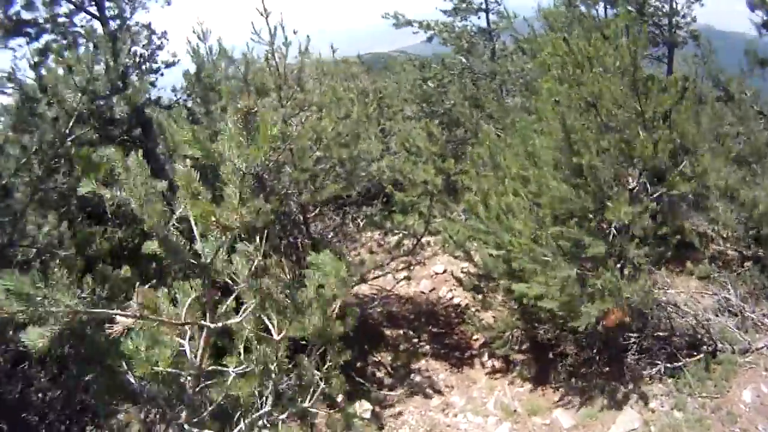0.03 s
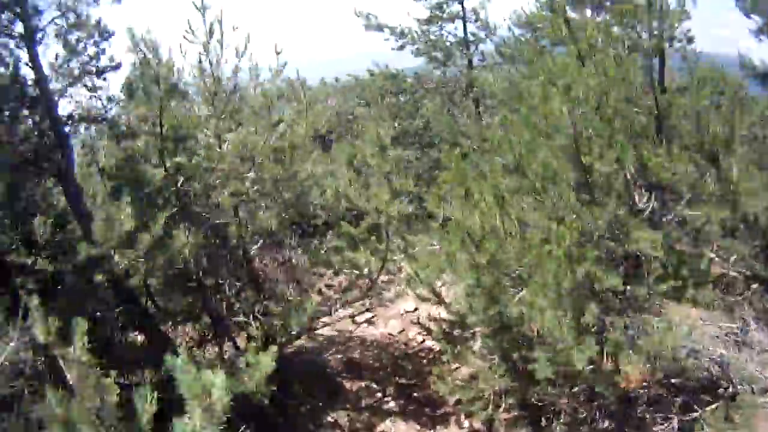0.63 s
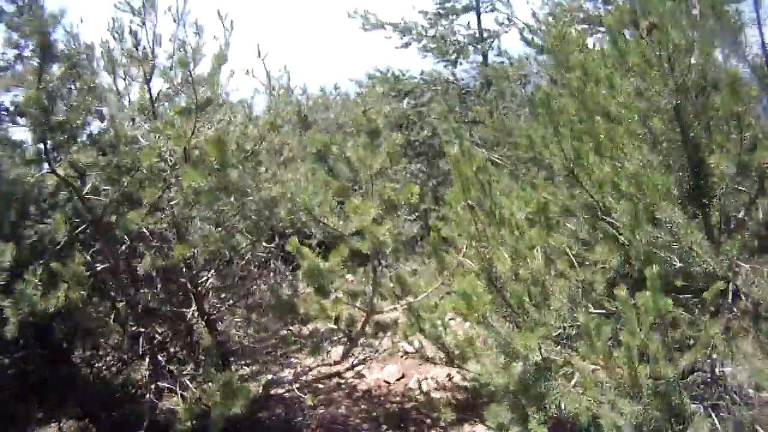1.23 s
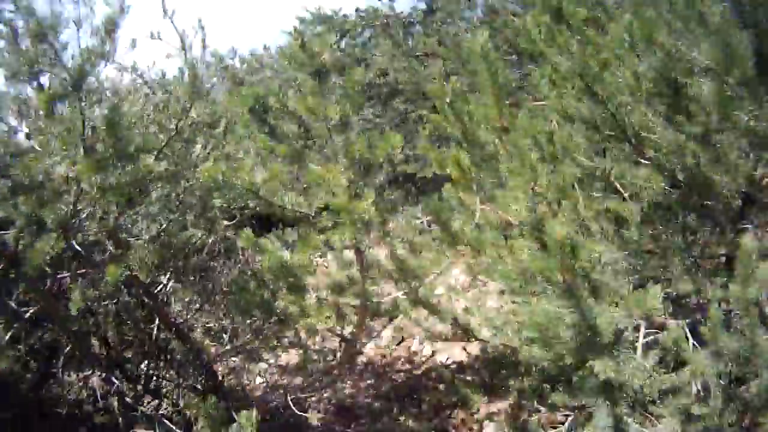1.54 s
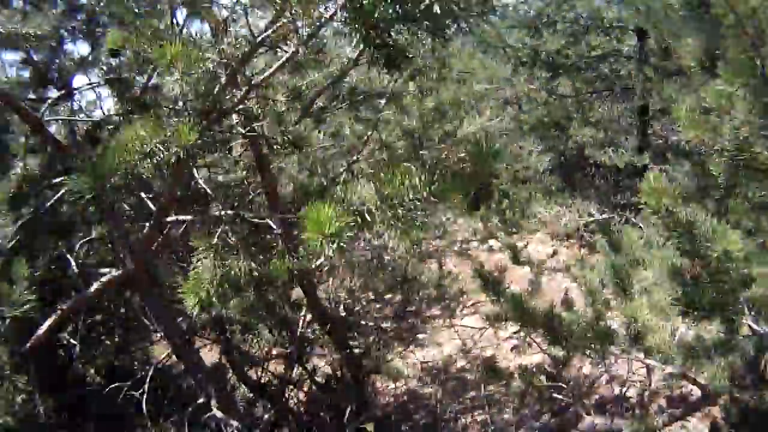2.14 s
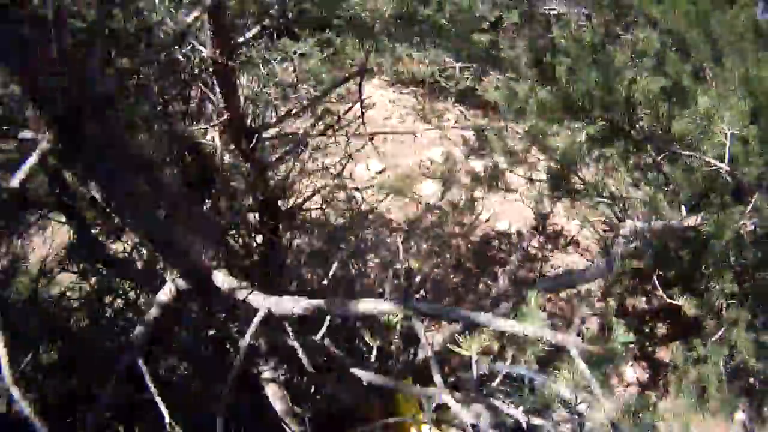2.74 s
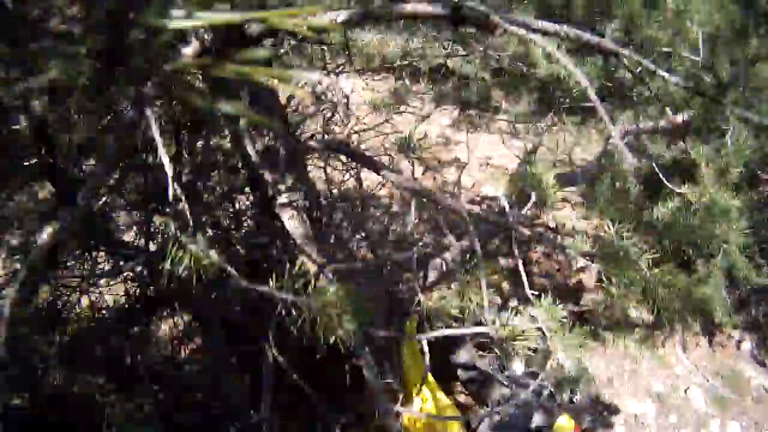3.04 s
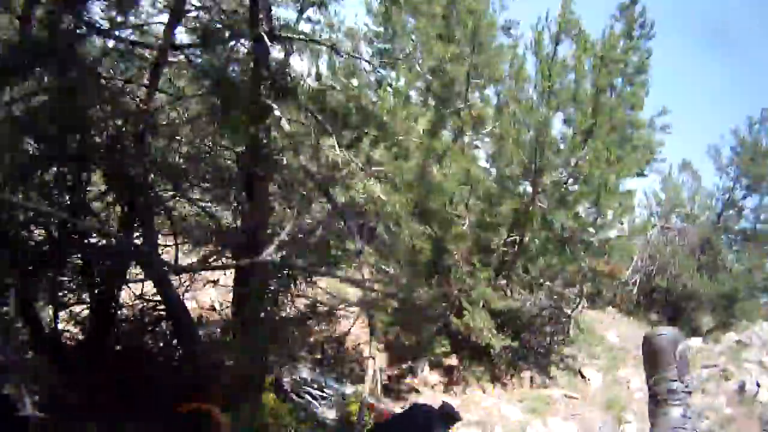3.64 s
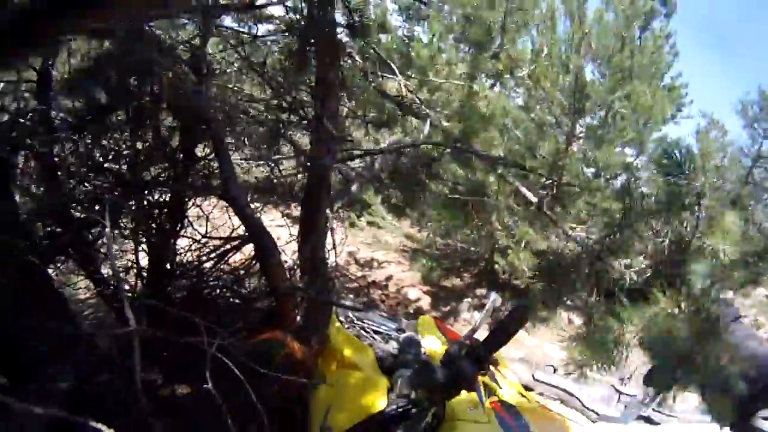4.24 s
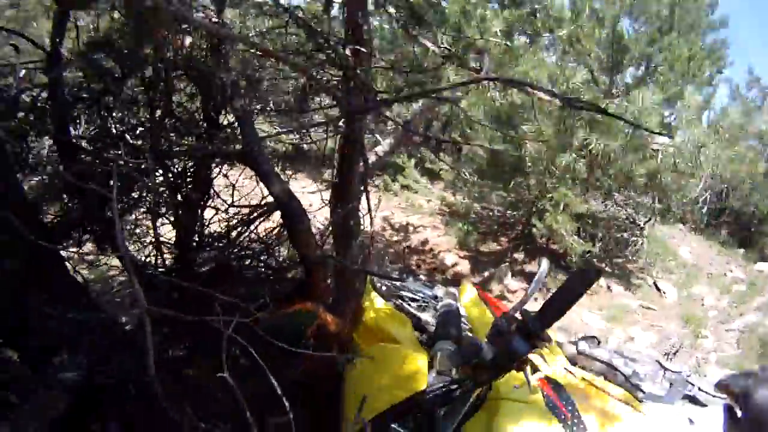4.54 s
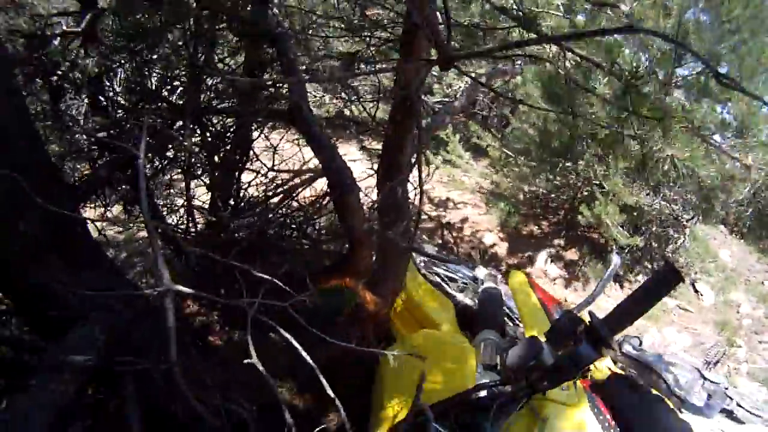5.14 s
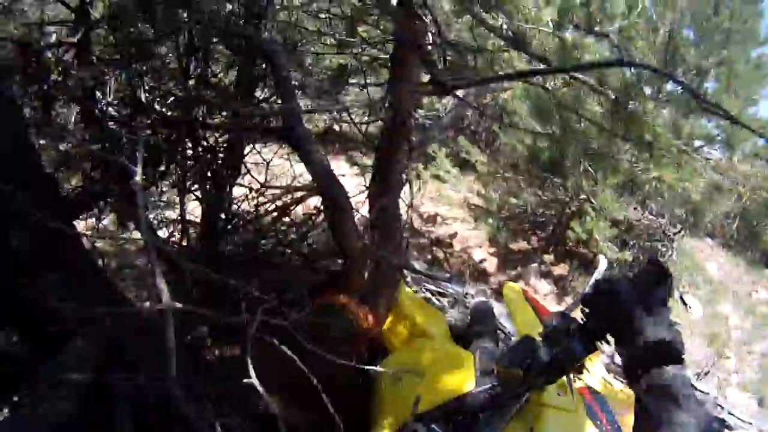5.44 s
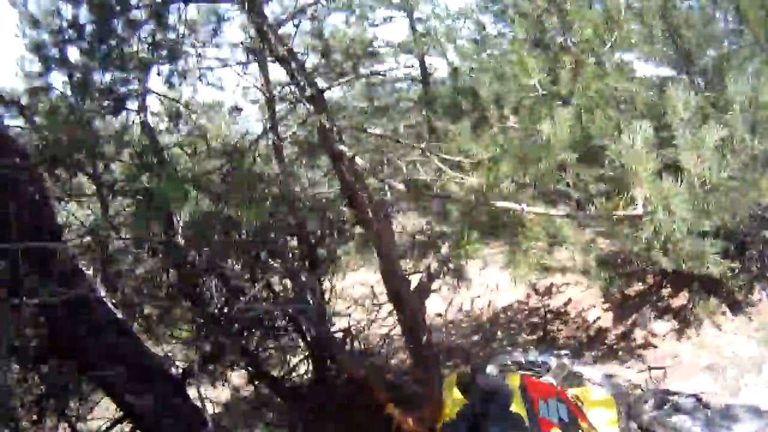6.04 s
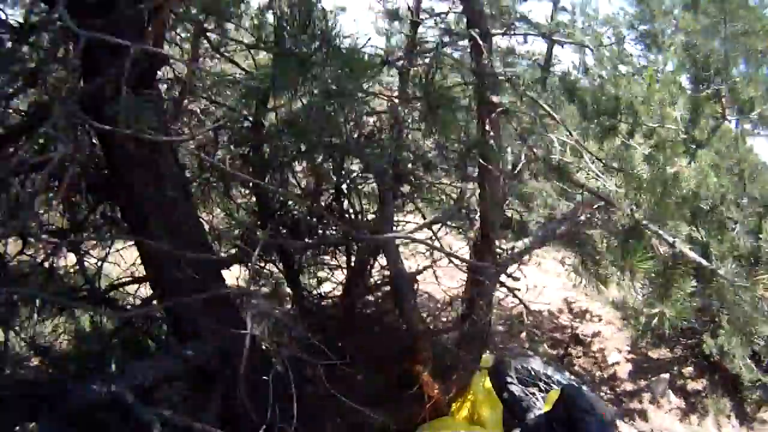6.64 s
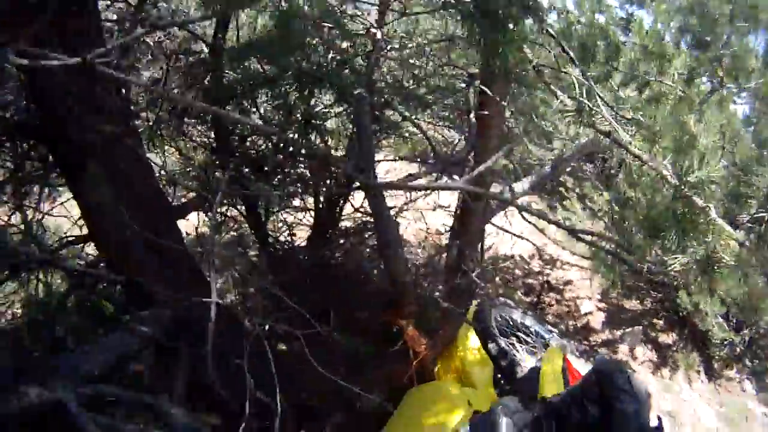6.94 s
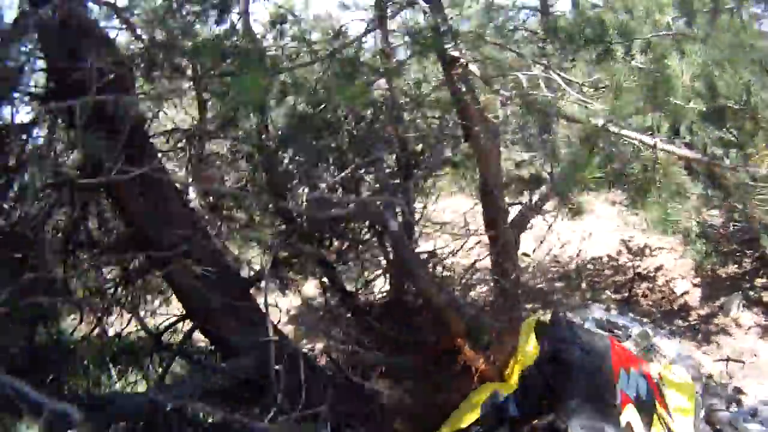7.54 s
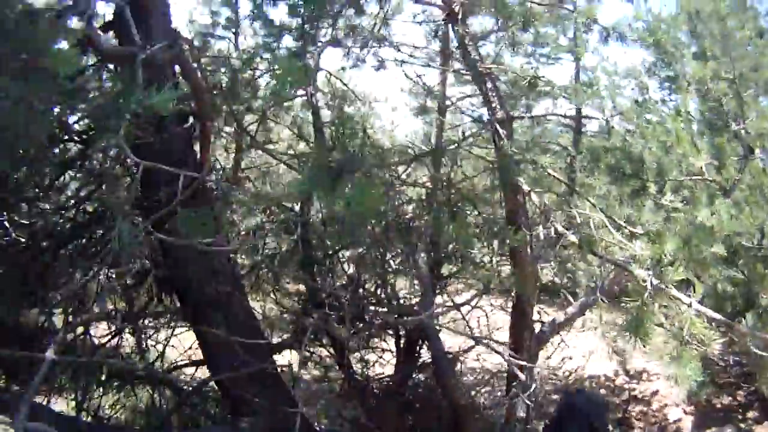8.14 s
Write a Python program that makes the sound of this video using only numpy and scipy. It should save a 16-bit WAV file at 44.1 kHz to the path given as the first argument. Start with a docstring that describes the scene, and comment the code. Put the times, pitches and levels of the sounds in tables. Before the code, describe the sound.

Pine branches brush, scrape and snap against a close camera pushing through scrub, while wind gusts rumble on the microphone.

```python
"""A dry hillside of dense pine scrub: someone pushes through with a small body-worn camera.
Gusts rumble on the microphone and rush around the plastic case. Needles brush over clothing and case,
a hiss when light, a crackle when pressed. Twigs snap, knock and scrape against the case and make it
ring, and the camera bumps dully on its wearer. Its coarse sampling gives every crack a gritty treble."""
import sys
import numpy as np
from scipy import signal
from scipy.fft import rfft, irfft
from scipy.io import wavfile
from scipy.ndimage import uniform_filter1d

SR = 44100
rng = np.random.default_rng(int(sys.argv[2]) if len(sys.argv) > 2 else 0)


def put_to_file(sound):
    """Save the sound as 16-bit audio at rate SR, in the file named by the first command-line argument."""
    columns = np.atleast_2d(sound).T  # one column per channel
    safe = np.clip(columns, -1, 1)
    whole_steps = np.round(safe * 32767)
    wavfile.write(sys.argv[1], SR, whole_steps.astype(np.int16))


N = 365148
TIME = np.arange(N) / SR

# gusts: start_s, hold_s, buffet_db, rush_db
WIND_GUSTS = [(0, 0.37, -14, -17.5), (0.718, 0.14, -14.5, -26.5), (1.452, 0.05, -40.5, -37),
              (3.24, 0.083, -17, -24), (3.83, 0.071, -38, -57), (4.2, .25, -26.5, -56),
              (5.12, 0.24, -30.5, -68), (5.76, 0.055, -19.5, -27.5), (6.659, 0.09, -41, -31.5),
              (7.24, 0.38, -29, -52)]
# low rumble of eddies on the microphone port: frequency_hz, level_db
BUFFET_SPECTRUM = [(14, -30), (30, 1), (72, 0), (170, -4.5), (260, -10), (400, -15), (800, -47.5)]
# hollow rush of air around the case: frequency_hz, level_db
RUSH_SPECTRUM = [(150, -8), (300, -5.5), (450, 3), (570, 2.5), (720, -3.5), (1000, -22), (1900, -34.5),
                 (3400, -43)]

# resonances of the case, first the air inside, then the walls: pitch_hz, width_hz, level_db
CASE_MODES = [(500, 33.5, -0.5), (577, 194, -7), (702, 190, 0), (870, 73, 0), (1108, 197, -4),
              (1807, 225, -4.5), (2271, 213, -2), (2613, 93, -2), (3004, 228, -0.5), (3946, 177, -2),
              (4610, 880, -11)]
AIR_HZ, UPPER_WALL_HZ = CASE_MODES[0][0], CASE_MODES[-2][0]
MODES_PER_BAND = (2, 3, 4, 2)   # low to high, the modes form four bands: knock, shell, crack, tick
# tone of each kind of contact: knock_db, shell_db, crack_db, tick_db
LIGHT_TONE, HARD_TONE = (-33, -6.5, -3.5, -23), (-1.5, -4, -3.5, -10)
SNAP_TONE, KNOCK_TONE, SCRAPE_TONE = (-17.5, -8, 1, -4.5), (-2.5, -12, -16.5, -25), (-2.5, 2.5, 1, -2.5)

# bed of light rustle between the boughs: time_s, level_db
RUSTLE_CURVE = [(0, -51), (.24, -58), (.39, -43.5), (.62, -50), (2.2, -49.5), (2.75, -38.5), (3.15, -46.5),
                (3.9, -40), (4.5, -47), (4.8, -53), (5.4, -48.5), (5.85, -43), (6.38, -53), (6.95, -46.5),
                (7.43, -54.5), (8.0, -47), (8.28, -57)]
# boughs of needles sweep over the camera: start_s, hold_s, level_db
BOUGH_SWEEPS = [(0, 0.03, -41), (2.66, 0.051, -30), (3.36, 0.16, -33), (3.665, 0.0091, -30),
                (4.06, .16, -33), (4.43, 0.088, -38), (5.91, 0.15, -32.5), (6.5, 0.15, -34.5),
                (6.79, 0.057, -30.5), (7.22, 0.13, -38), (8.02, 0.1, -41)]
# thin dry twigs snap: start_s, length_s, gain_db, tilt_db_per_band, pitch_hz
TWIG_SNAPS = [(.505, 0.0031, -43.5, -6, 2100), (.806, 0.0024, -51.5, -1, 2580),
              (2.02, 0.0018, -51, 0, 3000), (2.274, 0.0058, -45, -3, 2460),
              (2.9677, .0019, -32, -1.5, 3300), (3.4411, .0052, -15, -6, 2780),
              (3.7328, .001, -20, 3, 2280), (3.7602, .001, -23, 2, 3080), (3.7946, .0014, -30, 2.5, 4100),
              (3.926, .003, -37, 2, 2400), (3.9381, .0056, -21, 2.5, 2440),
              (3.9628, .0013, -26, -2.5, 2400), (4.2572, .0055, -33, -3, 2540), (4.364, .003, -35, 2, 2500),
              (4.44, .0038, -23.5, -4, 2520), (4.4661, .0015, -19, 10, 3880),
              (4.6874, .0023, -10.5, 3, 3820), (4.749, .004, -7, 1.5, 2420),
              (4.7565, 0.00088, -27, 0, 2150), (4.9676, .0008, -35.5, 0, 2440),
              (5.1003, .0038, -41.5, -3.5, 2130), (5.7144, .005, -33.5, -1, 3000),
              (5.9829, .006, -26.5, 6.5, 2250), (6.7756, .0028, -8, 1, 2040),
              (7.1744, .008, -30.5, 8, 3950), (7.428, 0.0022, -37.5, 7.5, 4430)]
# blunt branches knock on the case: start_s, length_s, gain_db
BRANCH_KNOCKS = [(2.593, 0.017, -16.5), (2.6104, 0.0028, -10), (2.6193, 0.013, -7.5), (2.664, 0.043, -14),
                 (3.6288, 0.0058, -19.5), (4.1128, 0.023, -17.5), (5.265, 0.0048, -25),
                 (5.5107, .0075, -16), (5.5872, 0.0026, -16.5), (5.5926, 0.017, -17), (6.4954, 0.016, -14),
                 (7.1948, 0.0082, -12.5), (7.237, 0.0043, -12.5)]
# twigs scrape over the case: start_s, length_s, gain_db, tilt_db_per_band, pitch_hz
TWIG_SCRAPES = [(2.6587, 0.0033, -24.5, -3, 610), (2.7126, 0.007, -20, 1.5, 2460),
                (2.7315, 0.011, -22.5, 2, 905), (3.3209, .013, -24, 4, 3800),
                (3.3383, 0.032, -26, -1, 1110), (3.4017, 0.022, -21, -0.5, 740),
                (3.5931, 0.0082, -23.5, -3, 1090), (3.6337, 0.034, -23, 1, 630),
                (4.054, 0.023, -21, 4, 2290), (4.2, 0.018, -32, 1.5, 2320), (5.372, .012, -44, -8, 860),
                (5.4011, 0.0091, -39, -1.5, 620), (5.802, 0.0054, -33.5, -4, 2130),
                (5.9972, .017, -29.5, -4, 846), (6.055, 0.031, -32.5, -2, 910),
                (6.138, 0.028, -26.5, -3.5, 596), (6.1749, 0.01, -26, 0, 2930),
                (6.223, 0.0068, -29.5, 3.5, 3600), (6.555, 0.02, -24.5, -4.5, 676),
                (6.625, 0.0096, -18.5, -2, 936), (6.7847, 0.0029, -17, 2.5, 3920),
                (6.804, 0.012, -35.5, -7, 1250), (7.2668, 0.0061, -15.5, -1, 1160),
                (7.3339, 0.0037, -34, -1.5, 2300), (7.9868, 0.02, -30.5, -5, 640),
                (8.0196, 0.018, -32.5, -6.5, 700), (8.0579, 0.018, -27.5, -1, 684),
                (8.1594, 0.012, -33, -5.5, 1020)]
# the camera bumps on its wearer: start_s, level_db
BODY_BUMPS = [(0.807, -19.5), (2.129, -32.5), (3.148, -24.5), (4.75, -29), (7.96, -21.5)]
# single needles drag along the case: start_s, hold_s, level_db
NEEDLE_STROKES = [(6.48, .025, -33), (6.68, 0.047, -37.5), (6.92, 0.25, -50.5), (7.77, 0.081, -59)]


def from_db(db):
    """Decibels to gain."""
    return 10 ** (np.asarray(db) / 20)


def rms_one(x):
    """Scale to rms 1."""
    return x / np.sqrt(np.mean(x ** 2) + 1e-20)


def drift(rate_hz):
    """Smooth random modulation up to about this rate; rms 1."""
    white = rfft(rng.standard_normal(N))
    return rms_one(irfft(white / (1 + (np.fft.rfftfreq(N, 1 / SR) / rate_hz) ** 4), N))


def swells(rows, attack_s, release_s):
    """Envelope of overlapping (start_s, hold_s, level_db) swells, each at full strength from start_s."""
    power = np.zeros(N)
    for start_s, hold_s, level_db in rows:
        fade = np.maximum(start_s - TIME, 0) / attack_s + np.maximum(TIME - start_s - hold_s, 0) / release_s
        power += from_db(2 * level_db) * np.exp(-2 * np.minimum(fade, 20))
    return np.sqrt(power)


def coloured(x, spectrum):
    """Minimum-phase EQ that follows a spectrum and rolls off beyond its ends; rms 1."""
    hz, db = np.transpose(spectrum)
    octave, points = np.log2(np.fft.rfftfreq(N, 1 / SR) + 1), np.log2(hz)
    octaves_outside = np.abs(octave - np.clip(octave, points[0], points[-1]))
    curve_db = np.interp(octave, points, db) - 18 * np.minimum(octaves_outside, 3)
    cepstrum = irfft(np.log(from_db(curve_db)), N)
    cepstrum[1:N // 2] *= 2
    cepstrum[N // 2 + 1:] = 0
    return rms_one(irfft(rfft(x) * np.exp(rfft(cepstrum)), N))


def wind(attack_s=0.096, release_s=0.14, lump_db=2.5, buffet_gain_db=-0.57, rush_gain_db=-6.5):
    """Eddies buffet the microphone port and rush around the case in shared lumps; gusts top a breeze."""
    start_s, hold_s, buffet_db, rush_db = np.transpose(WIND_GUSTS)
    breeze_buffet = from_db(-46.5)
    breeze_rush = from_db(-33.5 - 0.57 * TIME)   # fades deeper in the thicket
    on_port = np.hypot(swells(zip(start_s, hold_s, buffet_db), attack_s, release_s), breeze_buffet)
    around_case = np.hypot(swells(zip(start_s, hold_s, rush_db), attack_s, release_s), breeze_rush)
    lumps = from_db(lump_db * drift(rate_hz=22))
    buffet = on_port * coloured(lumps * rng.standard_normal(N), BUFFET_SPECTRUM)
    rush = around_case * coloured(lumps * rng.standard_normal(N), RUSH_SPECTRUM)
    return from_db(buffet_gain_db) * buffet + from_db(rush_gain_db) * rush


def resonance(x, hz, width_hz):
    """Two-pole resonance with gain 1 at its peak."""
    r = np.exp(-np.pi * width_hz / SR)
    gain = (1 - r * r) / 2
    return signal.lfilter([gain, 0, -gain], [1, -2 * r * np.cos(2 * np.pi * hz / SR), r * r], x)


def case_ring(force, damping=0.93, spread_db=0, detune=0):
    """The case's four bands under a force; each point of contact favours and shifts other modes."""
    rings = []
    for k, (hz, width_hz, level_db) in enumerate(CASE_MODES):
        favour, shift = rng.standard_normal(2)
        ring = resonance(force, hz * (1 + detune * shift), damping * width_hz)
        rings.append((-1) ** k * from_db(level_db + spread_db * favour) * ring)
    bands = np.split(np.array(rings), np.cumsum(MODES_PER_BAND)[:-1])
    return [band.sum(axis=0) for band in bands]


def brushing_db():
    """Level of the needles: a light rustle, and a swell for each bough."""
    rustle = from_db(np.interp(TIME, *np.transpose(RUSTLE_CURVE)))
    boughs = swells(BOUGH_SWEEPS, attack_s=0.049, release_s=0.017)
    return 20 * np.log10(np.hypot(rustle, boughs))


def needles(points=5, flicks_per_s=330, flick_spread_db=7.5, flick_s=0.0029, rub=0.032, catch_db=-43):
    """A light touch only hisses; pressed harder, needles catch and flick at several points on the case."""
    crackle = np.zeros(N)
    for _ in range(points):
        sizes = from_db(flick_spread_db * np.clip(rng.standard_normal(N), -2, 2))
        flicks = sizes * (rng.random(N) < flicks_per_s / points / SR)
        friction = rub + signal.lfilter([1], [1, -np.exp(-1 / (flick_s * SR))], flicks + 1e-18)
        bands = case_ring(friction * rng.standard_normal(N), damping=0.92, spread_db=1.5, detune=0.037)
        crackle += sum(from_db(db) * rms_one(band) for db, band in zip(HARD_TONE, bands))
    crackle /= np.sqrt(uniform_filter1d(crackle ** 2, size=3000) / 2)   # pressure sets the mean force
    soft_bands = case_ring(rng.standard_normal(N), damping=1.6)
    hiss = sum(from_db(db) * rms_one(band) for db, band in zip(LIGHT_TONE, soft_bands))
    brush_db = brushing_db()
    pressed = 1 / (1 + from_db(2 * (catch_db - brush_db)))   # crossfade from hiss to crackle
    return from_db(brush_db) * (np.sqrt(pressed) * crackle + np.sqrt(1 - pressed) * hiss)


def hit_at_level(sound, level_db):
    """Scale a short sound to the energy of 10 ms at this level."""
    return from_db(level_db) * sound * np.sqrt(SR / 100 / np.sum(sound ** 2))


def twig(length_s, bands_db, pitch_hz, grain_db=0.5, note_db=12, tail_db=-28, tail_s=0.0034):
    """A twig sticks and slips on the case: a short swell of tiny jerks, coloured by its own note."""
    t = np.arange(SR // 7) / SR
    swell = (t / length_s) ** 0.44 * np.exp(-(t / length_s) ** 2)
    quiver = from_db(tail_db) * (1 - np.exp(-t / length_s)) * np.exp(-t / tail_s)
    jerks = rng.standard_normal(len(t)) * from_db(grain_db * rng.standard_normal(len(t)))
    note = from_db(note_db) * resonance(jerks, pitch_hz, width_hz=0.048 * pitch_hz)
    groan = 0.19 * np.sin(2 * np.pi * AIR_HZ * t)   # slips partly in step with the hollow ring
    bands = case_ring((swell + quiver) * (jerks + note + groan), spread_db=3.5, detune=0.016)
    return sum(hit_at_level(band, db) for band, db in zip(bands, bands_db))


def contacts(rows, tone_db):
    """Wood meets the case; tilt trades knock for tick, and blunt branches take the note of the air inside."""
    out = np.zeros(N + SR)
    steps_from_crack = np.arange(len(tone_db)) - 2
    for start_s, length_s, gain_db, *colour in rows:
        tilt_db, pitch_hz = colour or (0, AIR_HZ)
        bands_db = gain_db + np.array(tone_db) + tilt_db * steps_from_crack
        sound = twig(max(length_s, 1e-3), bands_db, pitch_hz)
        start = round(start_s * SR)
        out[start:start + len(sound)] += sound
    return out[:N]


def twigs(gain_db=2.5, low_cut_hz=330):
    """All the snaps, knocks and scrapes; thin twigs carry no bass."""
    snaps = contacts(TWIG_SNAPS, SNAP_TONE)
    knocks = contacts(BRANCH_KNOCKS, KNOCK_TONE)
    scrapes = contacts(TWIG_SCRAPES, SCRAPE_TONE)
    low_cut = signal.butter(2, low_cut_hz, "high", fs=SR, output="sos")
    return from_db(gain_db) * signal.sosfilt(low_cut, snaps + knocks + scrapes)


def bumps(thud_hz=260, width_hz=330, push_s=0.0029):
    """The camera thuds on its wearer: a soft, heavily damped shove."""
    out = np.zeros(N)
    t = np.arange(SR // 10) / SR
    for start_s, level_db in BODY_BUMPS:
        shove = t * np.exp(-t / push_s) * rng.standard_normal(len(t))
        thud = resonance(resonance(shove, thud_hz, width_hz), thud_hz, width_hz)
        start = round(start_s * SR)
        out[start:start + len(t)] += hit_at_level(thud, level_db)
    return out


def stray_twigs(count=45, from_s=2.7, lift_db=9.0, cap_db=-37, scatter_db=1.5, slip_s=0.0023):
    """Inside the thicket small dry twigs tick on the case at random, riding the level of the needles."""
    brush_db = brushing_db()
    out = np.zeros(N + SR)
    for when, size, slip in zip(rng.random(count), rng.standard_normal(count), rng.random(count)):
        start = int(from_s * SR + when * (N - 1 - from_s * SR))
        gain_db = min(brush_db[start] + lift_db + scatter_db * size, cap_db)
        sound = twig(slip_s * (.5 + slip), gain_db + np.array(HARD_TONE), pitch_hz=2400)
        out[start:start + len(sound)] += sound
    return out[:N]


def needle_drags(chatter_db=6.5, edge_s=0.012):
    """A needle tip catches and lets go quickly, waking one upper wall mode: a thin, chattering hiss."""
    force = from_db(chatter_db * drift(rate_hz=60)) * rng.standard_normal(N)
    hiss = rms_one(resonance(force, UPPER_WALL_HZ, width_hz=420))
    return swells(NEEDLE_STROKES, edge_s, edge_s) * hiss


def scene():
    """Everything plays right at the camera, in mono, in open air without echo."""
    return (twigs() + stray_twigs() + needles() + bumps() + wind() + needle_drags())[None, :]


def record(dry, ceiling=0.96, input_cut_hz=5600, camera_rate_hz=12000, output_cut_hz=15400):
    """Snaps overload the input; the camera holds each slow sample, mirroring the sound into the treble."""
    clipped = np.clip(dry, -ceiling, ceiling)
    dulled = signal.sosfilt(signal.butter(4, input_cut_hz, fs=SR, output="sos"), clipped)
    samples = signal.resample_poly(dulled, camera_rate_hz, SR, axis=1)
    held = np.repeat(samples, 4, axis=1)
    gritty = signal.resample_poly(held, SR, 4 * camera_rate_hz, axis=1)[:, :N]
    return signal.sosfilt(signal.ellip(10, .2, 70, output_cut_hz, fs=SR, output="sos"), gritty)


dry = scene()
out = record(dry)
put_to_file(out)
```